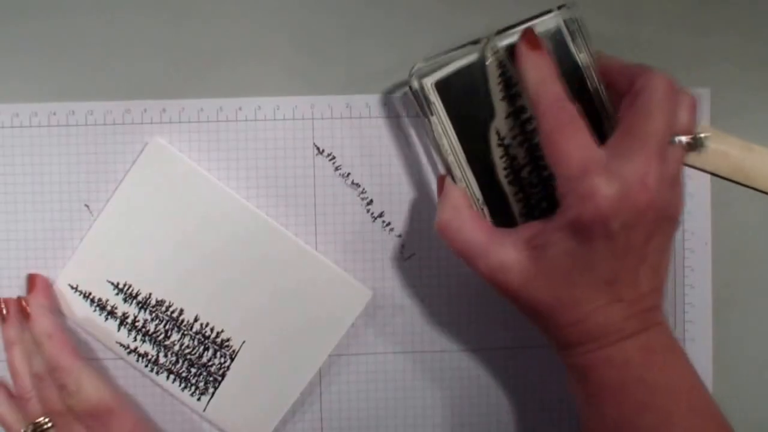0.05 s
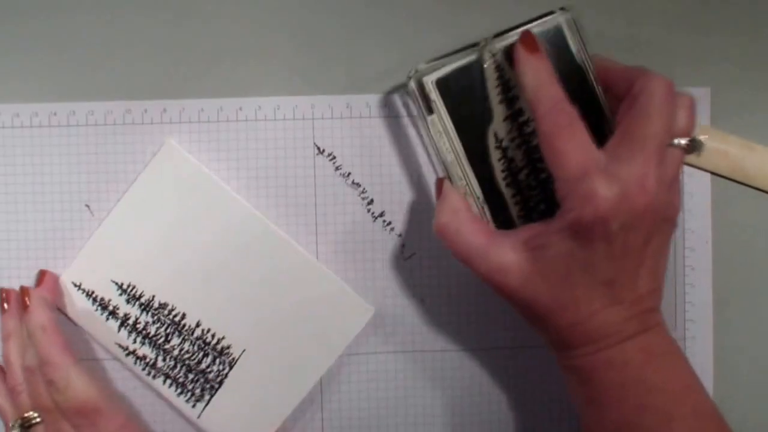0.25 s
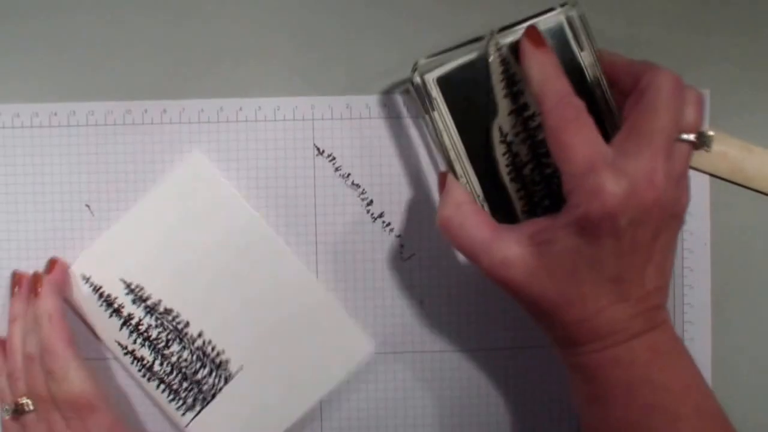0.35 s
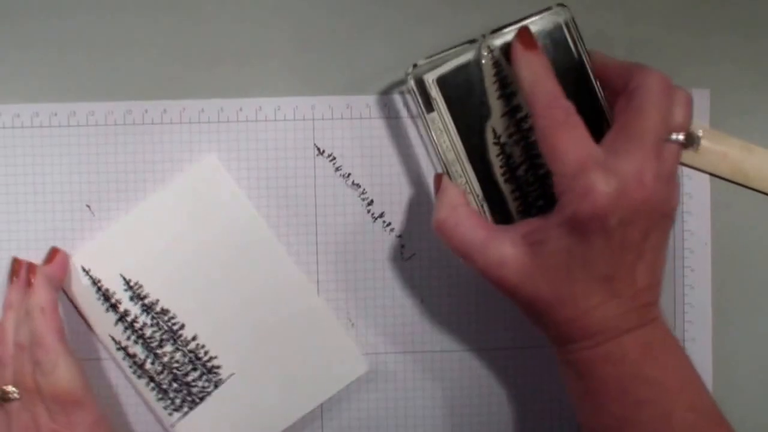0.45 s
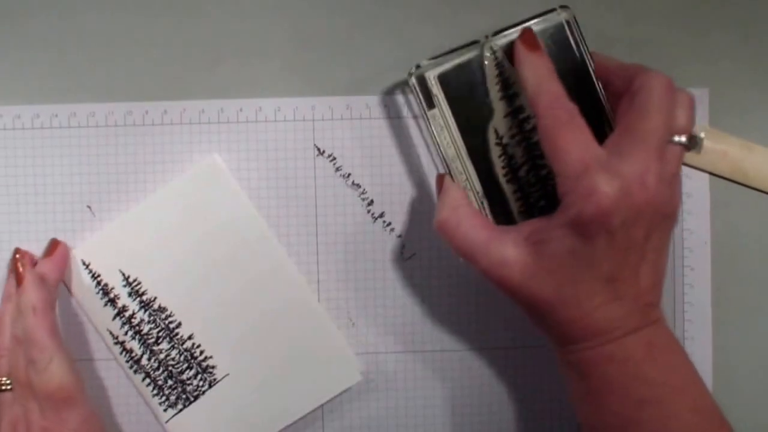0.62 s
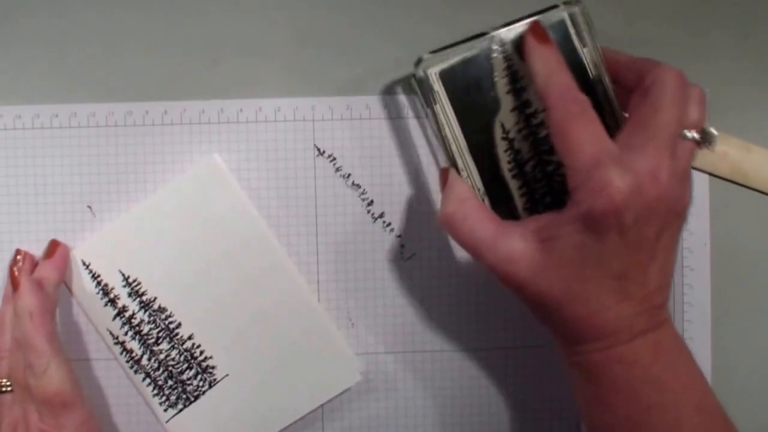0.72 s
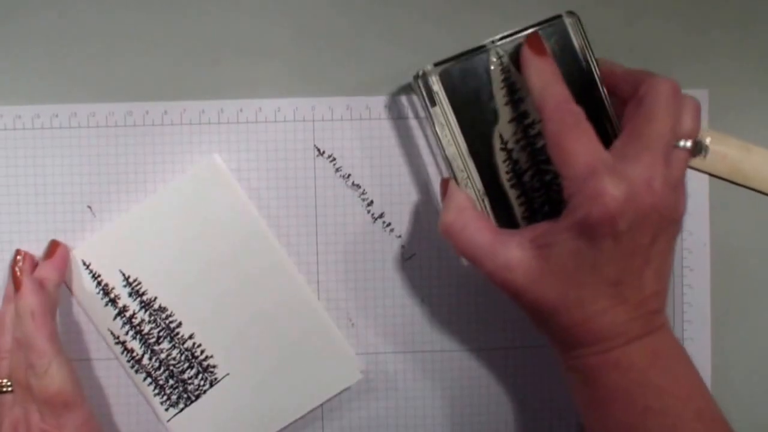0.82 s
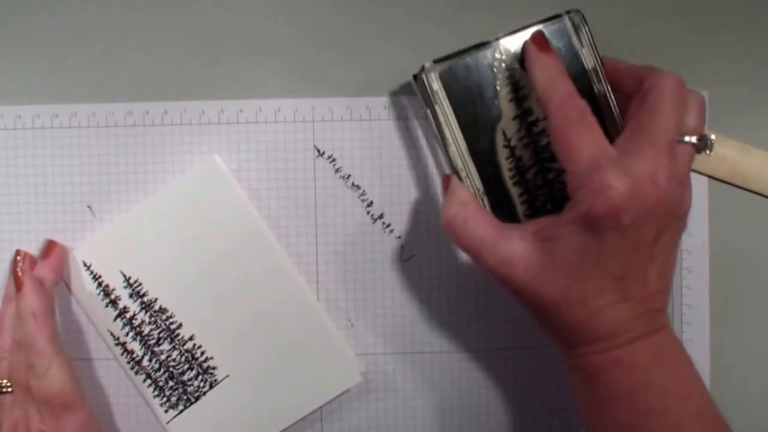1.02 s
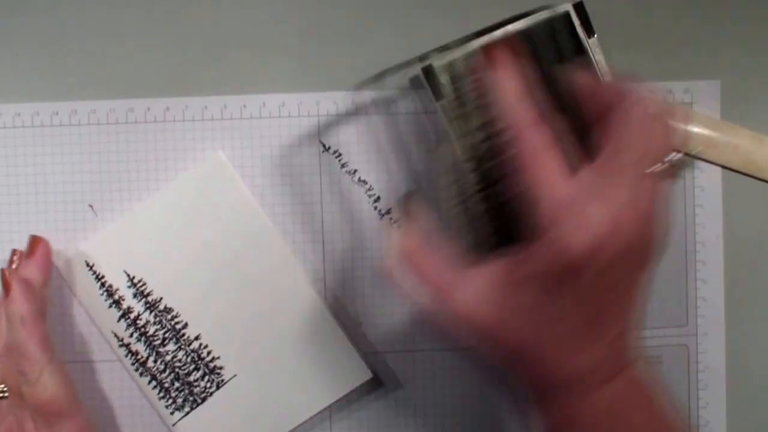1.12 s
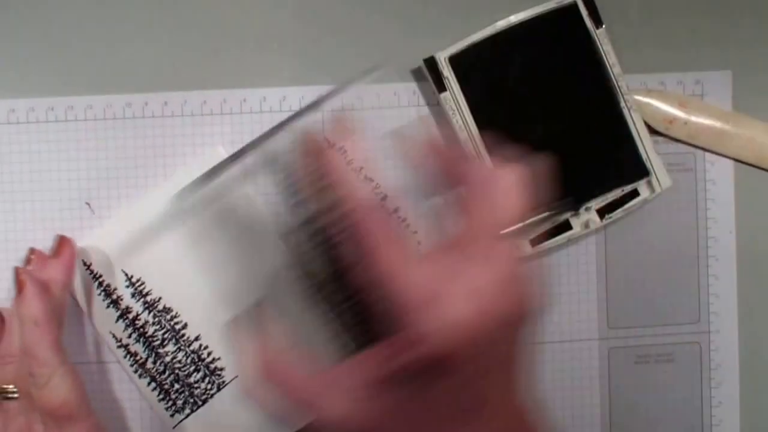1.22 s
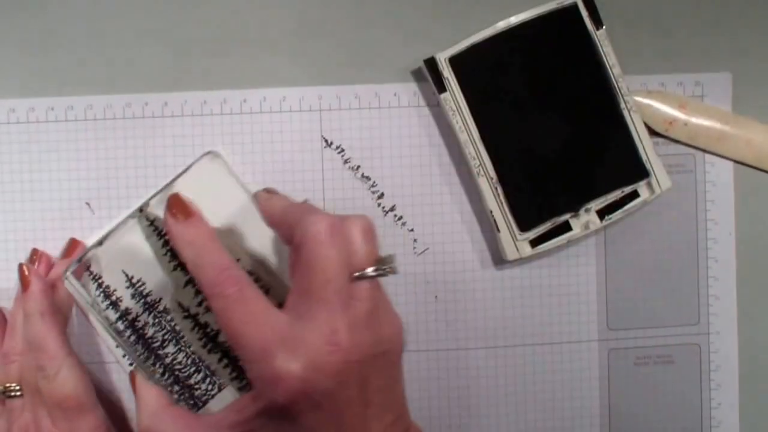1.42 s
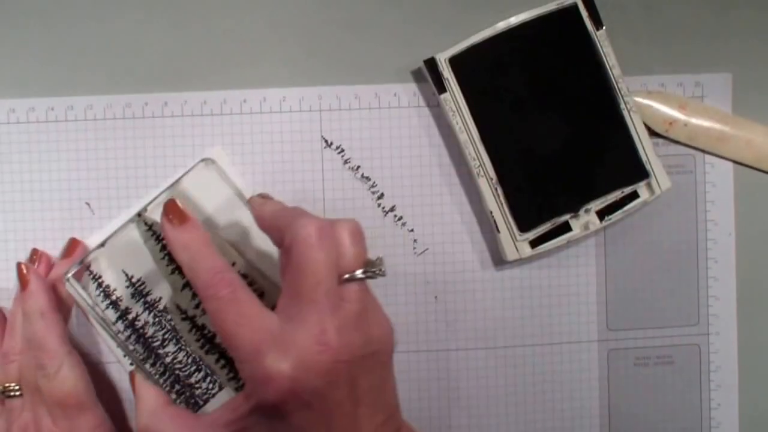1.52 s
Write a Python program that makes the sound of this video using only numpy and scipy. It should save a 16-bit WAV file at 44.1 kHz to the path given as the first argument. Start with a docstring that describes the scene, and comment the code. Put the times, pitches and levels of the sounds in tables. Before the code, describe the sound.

Six quick taps of a stamp block on a plastic-cased ink pad, table thudding softly

```python
"""Stamp on an ink pad

A stamp on an acrylic block is tapped six times on an ink pad in a plastic case, on a light table close by.
Each tap is a few quick contacts: short forces ring the block and case modes, noise bursts add crackle.
The table top wobbles after every push and release: decaying narrow-band noise at its modes.
Paper rustles and ticks softly (shaped noise); a short tail follows the taps, over the hush of a small room."""
import sys
import numpy as np
from scipy import signal
from scipy.fft import rfft, irfft
from scipy.io import wavfile
from scipy.ndimage import uniform_filter1d

SR = 44100
rng = np.random.default_rng(int(sys.argv[2]) if len(sys.argv) > 2 else 0)


def attenuation_scalar(level_db):
    """Turn a level in dB into a linear amplitude multiplier (20 dB per decade)."""
    decades = np.asarray(level_db, float) / 20
    return 10 ** decades


def dump_mix(stems):
    """Bounce the given channels to the path in sys.argv[1] as a 16-bit WAV at rate SR."""
    frames = np.atleast_2d(stems).T  # one column per channel
    limited = np.clip(frames, -1, 1)  # hard clip at full scale
    pcm = np.round(limited * 32767).astype(np.int16)
    wavfile.write(sys.argv[1], SR, pcm)


N = 68355


def evened(x):
    """Scales to rms 1."""
    return x / np.sqrt(np.mean(x ** 2) + 1e-20)


def read(points, hz):
    """Reads a spectrum table on a log-frequency axis."""
    f, value = np.transpose(points)
    return np.interp(np.log(hz + 1), np.log(f + 1), value)


def add(mix, s, sound):
    """Mixes a sound in at time s, cut at the end of the mix."""
    part = mix[max(round(s * SR), 0):][:len(sound)]
    part += sound[:len(part)]


def coloured(x, points, share=1):
    """Filters by a share of the dB values of a spectrum table."""
    n = x.shape[-1]
    gain_db = share * read(points, np.fft.rfftfreq(n, 1 / SR))
    return irfft(rfft(x) * attenuation_scalar(gain_db), n)


# modes of block and case: [f/Hz, level/dB, t60/s]
CASE_MODES = [(479.2, -1.5, 0.059), (730, -10, 0.027), (924, -2, 0.012), (1293, 0.5, 0.01),
              (1435, 0.5, 0.0089), (1720, -1, 0.013), (2127, -7, 0.0076), (2480, -7.5, 0.008),
              (3203, -2, 0.0041), (3832, -8.5, 0.011), (4860, -9.5, 0.011), (7150, -12, 0.011),
              (8500, -8.5, 0.026)]
# where each tap lands favours part of the modes: [tap start t/s, favoured f/Hz, lift/dB]
LANDINGS = [(.21, 1720, 4.5), (.40, 950, 6.5), (.59, 1020, 7), (.75, 2410, 4), (.95, 1720, 2),
            (1.10, 900, 9.5)]
LANDING_OCTAVES = 0.47
SPOT_DB = 1.  # random mode level spread per contact


def case_ring(s, force_db, contact_ms, t):
    """The rate of change of a short sin-squared force rings decaying sine modes."""
    hz, mode_db, t60_s = np.transpose(CASE_MODES)[:, :, None]
    sign = (-1.) ** np.arange(len(CASE_MODES))[:, None]
    spot_db = SPOT_DB * rng.standard_normal((len(CASE_MODES), 1))
    _, spot_hz, lift_db = [row for row in LANDINGS if row[0] < s][-1]
    landing_db = lift_db * np.exp(-(np.log2(hz / spot_hz) / LANDING_OCTAVES) ** 2)
    level = attenuation_scalar(mode_db + landing_db + spot_db - 60 * t / t60_s)
    ring = (sign * level * np.sin(2 * np.pi * hz * t)).sum(0)
    force = np.sin(np.pi * np.minimum(t[:128] * 1000 / contact_ms, 1)) ** 2
    return attenuation_scalar(force_db) * np.convolve(ring, np.diff(force))[:len(t)]


# crackle spectrum: [f/Hz, level/dB]
CRACK_SPECTRUM = [(800, -0.5), (2000, 4), (3500, -5.5), (6000, -7), (10000, -11), (14000, -18),
                  (16500, -45)]
# extra colour of the crackle that differs between channels: [f/Hz, level/dB]
CRACK_WIDE_SPECTRUM = [(1000, -6), (4000, -9), (8000, -3), (13000, 5.5)]
CRACK_T60_S, CRACK_WIDE_DB = 0.018, -11.5


def crackle(crack_db, t):
    """Decaying noise burst: a part common to both channels and a part that differs."""
    hiss = evened(coloured(rng.standard_normal((2, len(t))), CRACK_SPECTRUM))
    fade = attenuation_scalar(crack_db - 60 * t / CRACK_T60_S)
    wide = attenuation_scalar(CRACK_WIDE_DB) * coloured(hiss[1], CRACK_WIDE_SPECTRUM)
    return hiss[0] * fade, wide * fade


# block and case meeting, several times per tap: [t/s, force level/dB, contact/ms, crackle level/dB]
CONTACTS = [(.2178, -11.5, 0.79, -16), (.2190, -8, 0.18, -10.5), (.2222, -10.5, 0.34, -13.5),
            (.2252, -17, 0.74, -57), (0.4129, -14, 0.89, -50), (0.4142, -8.5, 0.23, -9.5),
            (0.417, -12, 0.36, -14), (0.4201, -18.5, 0.71, -49), (.5948, -10, 0.44, -51),
            (.5964, -13.5, 0.23, -12.5), (.5980, -8, 0.27, -8.5), (.5996, -15, 0.43, -34),
            (.6035, -27, 0.27, -50), (.7603, -23, .5, -34), (0.7635, -18.5, 0.28, -10),
            (0.7629, -5, 0.17, -4), (0.7656, -10, 0.4, -42), (0.9546, -8, 0.77, -27.5),
            (0.956, -4.5, 0.27, -11), (0.9594, -13, 0.24, -21), (.9602, -16, 0.59, -15.5),
            (.9635, -17, 0.84, -30), (1.1092, -38.5, 0.63, -22.5), (1.1086, -19.5, 0.74, -11.5),
            (1.111, -17, 0.62, -17), (1.113, -7, 0.24, -19.5), (1.116, -16, 0.36, -31),
            (1.1190, -30.5, 0.47, -34)]


def case():
    """Each contact adds modal ringing and crackle; returns the common and the differing part."""
    common, wide, t = np.zeros(N), np.zeros(N), np.arange(2048) / SR
    for s, force_db, contact_ms, crack_db in CONTACTS:
        crack, crack_wide = crackle(crack_db, t)
        add(common, s, case_ring(s, force_db, contact_ms, t) + crack)
        add(wide, s, crack_wide)
    return common, wide


# hand pushing on the table or letting it go: [t/s, push level/dB, firmness/(dB per octave)]
PUSHES = [(.0, -30, -3.5), (.035, -44, -10.5), (0.217, -27, 0), (.325, -29.5, -1), (.414, -25.5, 0),
          (0.524, -33.5, 0.5), (.596, -35, 1.5), (0.712, -32, -1.5), (0.764, -42.5, 3), (0.863, -31, -4),
          (.955, -23, 0), (1.06, -35.5, -0.5), (1.109, -21, -1.5), (1.215, -33.5, -4.5), (1.289, -41.5, -5)]
# modes of the table top: [f/Hz, level/dB, t60/s]
TABLE_MODES = [(46.82, -6, 0.51), (83.3, -14.5, 0.94), (119.7, -8.5, 0.6), (158.6, -1, 0.24),
               (188, -11, 0.22), (212.8, -4, 0.24), (266, -7, 0.16), (358, -16.5, 0.66), (518, -26, 1),
               (544, -5, 0.2), (750, -8.5, 0.28), (900, -14, 0.23), (950, -12, 0.43), (1290, -15, 0.37)]
SWELL_S = .015  # time constant: the table takes up the push gradually
# things lying on the table make modes waver: share of pitch at 200 Hz, exponent of its growth with pitch
LOOSE_SHARE, LOOSER_EXPONENT = 0.12, 0.32


def table():
    """Every push sets the modes swinging as narrow-band noise; firm pushes reach the higher ones."""
    out, t = np.zeros(N), np.arange(SR // 2) / SR
    hz, mode_db, t60_s = np.transpose(TABLE_MODES)[:, :, None]
    f = np.fft.rfftfreq(len(t), 1 / SR)
    half_width_hz = LOOSE_SHARE * (hz / 200) ** LOOSER_EXPONENT * hz / 2
    resonance = 1 / (1 + ((f - hz) / half_width_hz) ** 2)
    for s, push_db, firm_db in PUSHES:
        hiss = rng.standard_normal((len(TABLE_MODES), len(t)))
        waver = irfft(rfft(hiss) * resonance, len(t))
        waver /= waver.std(1, keepdims=True)
        level_db = mode_db + firm_db * np.log2(hz / hz[0]) - 60 * t / t60_s
        swing = (attenuation_scalar(level_db) * waver).sum(0)
        add(out, s, attenuation_scalar(push_db) * (1 - np.exp(-t / SWELL_S)) * swing)
    return out


# paper sliding and rubber peeling off the pad:
# [start t/s, length/s, level/dB, brightness/(dB per octave), rub peak f/Hz]
RUSTLES = [(-.06, .16, -50, 0, 600), (.11, .13, -50, 3, 7000), (.3, .14, -46, 1, 3600),
           (.47, .14, -42, 1, 2100), (.68, .1, -47, 0, 2200), (.85, .11, -45, -1, 2150),
           (1.0, .06, -52, 2, 5000), (1.17, .1, -52, 3, 7000), (1.43, .14, -56, 3, 8000)]
# rustle spectrum: [f/Hz, level/dB]
RUSTLE_SPECTRUM = [(200, -36), (500, -9.5), (1000, -9), (2100, -8.5), (3000, -11.5), (7000, -16.5),
                   (12000, -21), (16000, -38)]
GRAIN_DB = -5  # rms level flutter, sign immaterial
RUB_OCTAVES, RUB_DB = 0.13, 10.5  # half-width and height of the rub peak


def rustles():
    """Arched swells of noise with random grain, each with a narrow peak at its rubbing pitch."""
    out = np.zeros(N)
    flutter = evened(uniform_filter1d(rng.standard_normal(N), size=150))
    grainy = rng.standard_normal(N) * attenuation_scalar(GRAIN_DB * flutter)
    for start_s, length_s, db, bright_db, hz in RUSTLES:
        colour = [(f, g + bright_db * np.log2(f / 1000)) for f, g in RUSTLE_SPECTRUM]
        rub = [(hz * 2 ** -RUB_OCTAVES, 0), (hz, RUB_DB), (hz * 2 ** RUB_OCTAVES, 0)]
        progress = np.clip((np.arange(N) / SR - start_s) / length_s, 0, 1)
        arch = np.sin(np.pi * progress) ** 2
        out += attenuation_scalar(db) * arch * evened(coloured(coloured(grainy, colour), rub))
    return out


# small sticky snaps: [t/s, level/dB, f/Hz]
TICKS = [(.0044, -25, 3500), (0.1463, -50, 1500), (0.3343, -28, 8000), (.3521, -55, 3600),
         (.3691, -28, 3580), (0.388, -20.5, 3800)]
TICK_T60_S, TICK_RISE_S, TICK_WIDTH_HZ = 0.0084, 0.0014, 2000


def ticks():
    """Each snap is a band of noise with a quick rise and decay."""
    out, t = np.zeros(N), np.arange(1024) / SR
    for s, db, hz in TICKS:
        band = [(hz / 4, -26), (hz, 0), (hz + TICK_WIDTH_HZ, -12), (hz + 3 * TICK_WIDTH_HZ, -36)]
        hiss = evened(coloured(rng.standard_normal(len(t)), band))
        add(out, s, hiss * attenuation_scalar(db - 60 * t / TICK_T60_S) * (1 - np.exp(-t / TICK_RISE_S)))
    return out


# decay of the tail: [f/Hz, t60/s]
ROOM_DECAY = [(200, 0.51), (600, 0.1), (1500, 0.15), (4000, 0.17), (8000, 0.16), (14000, 0.094)]
# colour of the tail: [f/Hz, level/dB]
ROOM_COLOUR = [(300, 6), (1500, 1.5), (4000, -3), (8000, -7), (14000, -31)]
# part of the tail that differs between channels: [f/Hz, level/dB]
ROOM_WIDE = [(300, -11), (1500, -12.5), (4000, -6), (10000, 9)]
ROOM_DB = -16.5


def room(x):
    """Convolves with a short noisy tail, partly shared by the channels, each band dying at its own speed."""
    hz, t, z = signal.stft(rng.standard_normal((2, SR // 2)), SR, nperseg=128)
    decay = attenuation_scalar(-60 * t / read(ROOM_DECAY, hz)[:, None])
    shared, wide = signal.istft(z * decay, SR, nperseg=128)[1]
    wide = coloured(wide, ROOM_WIDE)
    tail = np.array([shared + wide, shared - wide]) / np.linalg.norm(shared)
    return attenuation_scalar(ROOM_DB) * signal.fftconvolve(x[None], coloured(tail, ROOM_COLOUR), axes=1)[:, :N]


# background spectrum: [f/Hz, level/dB]
HUSH_SPECTRUM = [(20, -34), (40, 4.5), (120, -7.5), (300, -13), (600, -11), (1200, -19), (2300, -17.5),
                 (4400, -22.5), (9000, -29.5), (15300, -34), (16300, -48)]
HUSH_DB, HUSH_SAME = -46, 0.63  # rms level, left-right correlation


def hush():
    """Steady background noise, partly shared by both channels."""
    left, other = rng.standard_normal((2, N))
    right = HUSH_SAME * left + np.sqrt(1 - HUSH_SAME ** 2) * other
    return attenuation_scalar(HUSH_DB) * evened(coloured(np.array([left, right]), HUSH_SPECTRUM))


# microphone pair: [f/Hz, left over right level/dB]
LEAN = [(60, 5), (180, 3), (550, 1.0), (1650, 0.5), (4970, 1.5), (15000, 6)]


def microphone_pair(near):
    """Splits the level difference unequally: left raised by 0.78 of it, right lowered by 0.22."""
    near = np.pad(near, (0, 4096))  # room for the filter response
    return np.array([coloured(near, LEAN, 0.78), coloured(near, LEAN, -0.22)])[:, :N]


def scene():
    """Case, table and paper lean left; the tail of the taps and the hush surround them."""
    taps, wide = case()
    pair = microphone_pair(taps + table() + rustles() + ticks())
    return pair + np.array([wide, -wide]) + room(taps) + hush()


def low_pass(x):
    """Removes everything above the highest recorded frequency."""
    return signal.sosfilt(signal.butter(12, 16650, fs=SR, output="sos"), x)


CEILING = 1  # full scale


def record(dry):
    """The input stage rounds off the loudest peaks by tanh saturation."""
    mix = CEILING * np.tanh(dry / CEILING)
    return low_pass(mix)


dry = scene()
out = record(dry)
dump_mix(out)
```